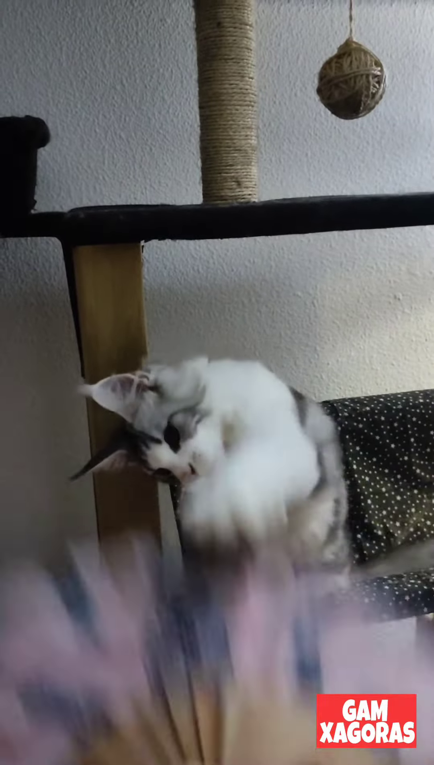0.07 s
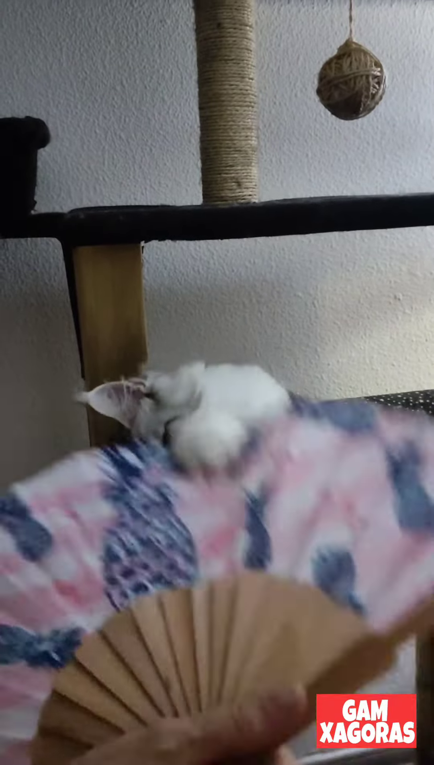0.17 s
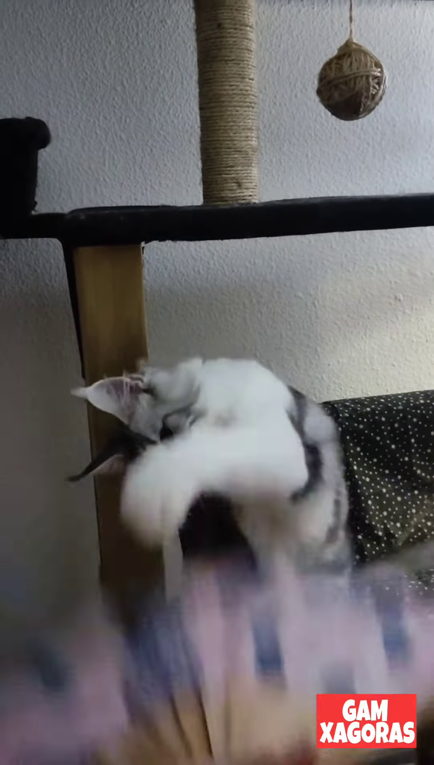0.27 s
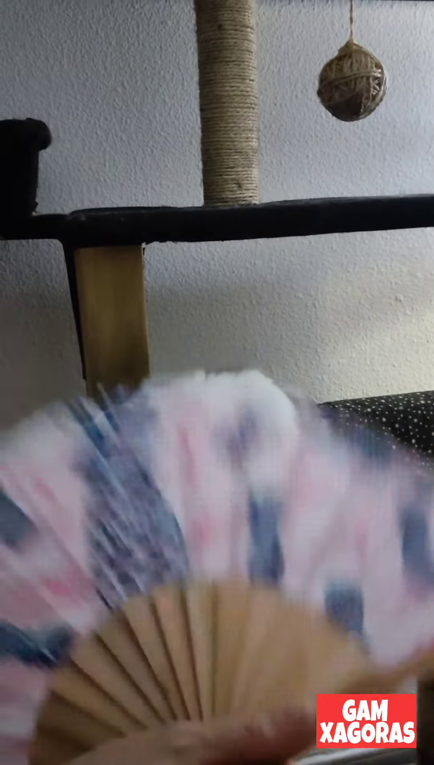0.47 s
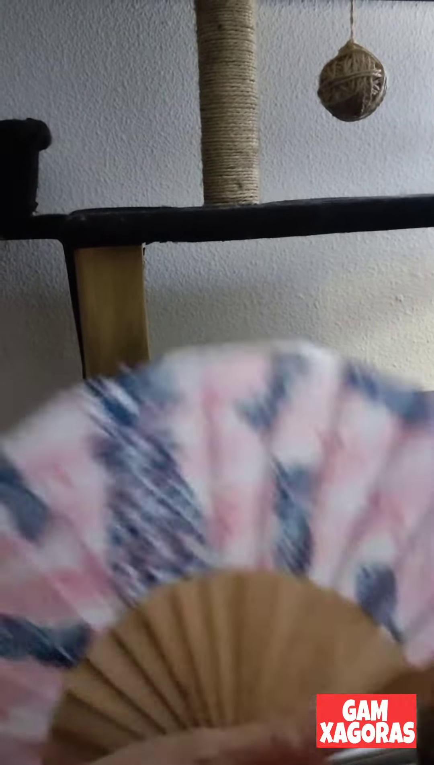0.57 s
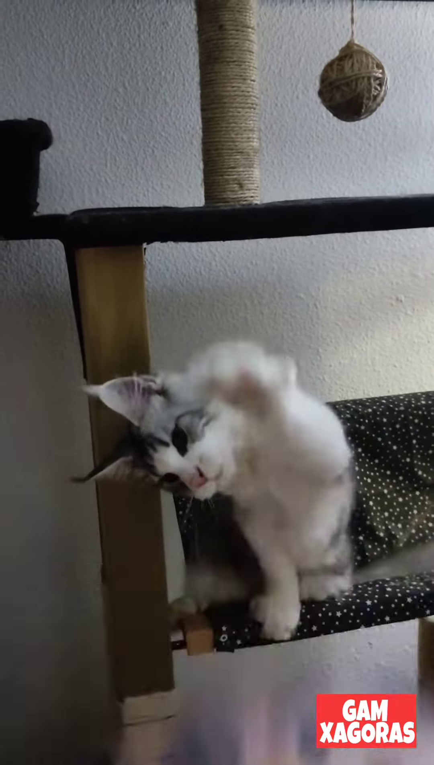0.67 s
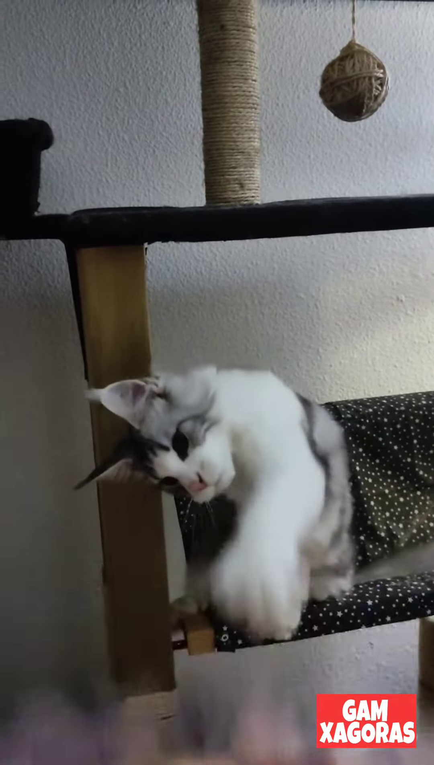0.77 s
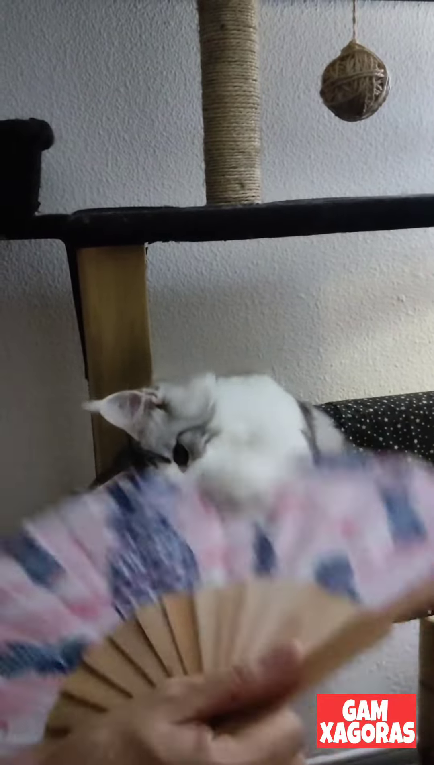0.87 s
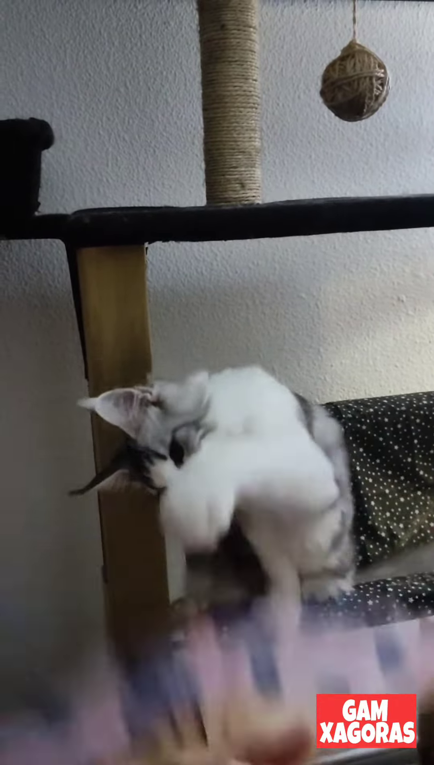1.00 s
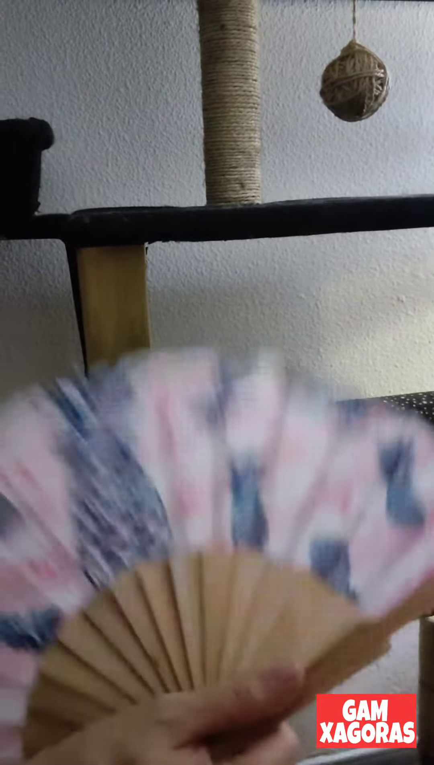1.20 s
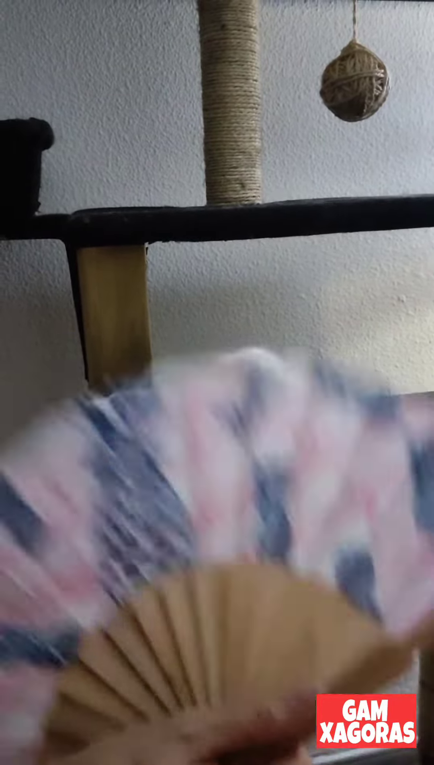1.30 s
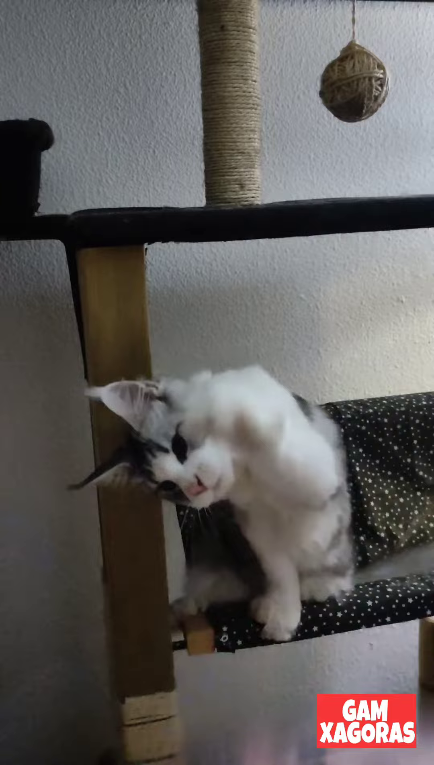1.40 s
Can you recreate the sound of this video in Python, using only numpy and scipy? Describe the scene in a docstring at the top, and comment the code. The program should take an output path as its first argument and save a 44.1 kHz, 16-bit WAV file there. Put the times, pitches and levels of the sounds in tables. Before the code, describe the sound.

Sharp clacks of a cloth and wood hand fan flicked close by, with faint rib rattles between

```python
"""A quiet, small room: a folding hand fan of wood and cloth is flicked close to a phone.
Knocking ribs ring a bank of low wood modes; their edges tick as clicks and crackle through bright resonances.
The cloth rustles as bursts of coloured grains. Decaying noise bands give the room's answer to the fan.
Under it lies a soft floor: steady hiss and a low murmur that swells unevenly."""
import sys
import numpy as np
from scipy import signal
from scipy.fft import rfft, irfft
from scipy.io import wavfile
from scipy.ndimage import uniform_filter1d, map_coordinates

SR = 44100
rng = np.random.default_rng(int(sys.argv[2]) if len(sys.argv) > 2 else 0)


def voltage_ratio(decibels):
    """Convert decibels (scalar or array-like) to amplitude ratios, 20 dB per decade."""
    exponent = np.asarray(decibels, float) / 20
    return 10 ** exponent


def transcribe(signal):
    """Save signal, clipped to [-1, 1], as a 16-bit WAV file at the path in sys.argv[1]."""
    frames = np.atleast_2d(signal).T
    limited = np.clip(frames, -1, 1)
    pcm = np.round(limited * 32767).astype(np.int16)
    wavfile.write(sys.argv[1], SR, pcm)


N = 63945


def read(table, hz):
    """Interpolates a (Hz, value) table over log frequency."""
    table_hz, value = np.array(table, float).T[:2]
    return np.interp(np.log(hz + 1), np.log(table_hz + 1), value)


def colour(x, table, tilt_db_per_octave=0.):
    """Shapes a sound by a spectrum and a tilt around 5 kHz; overall rms 1."""
    hz = np.fft.rfftfreq(x.shape[-1], 1 / SR)
    gain_db = read(table, hz) + tilt_db_per_octave * np.log2(np.maximum(hz, 100) / 5000)
    y = irfft(rfft(x) * voltage_ratio(gain_db), x.shape[-1])
    return y / np.sqrt(np.mean(y ** 2))


def band(x, hz, width_hz):
    """One resonance, gain 1 at the centre."""
    return signal.lfilter(*signal.iirpeak(hz, hz / width_hz, SR), x)


def add(out, x, start_s):
    """Mixes x into out at start_s, cut at the end."""
    i = int(start_s * SR)
    out[..., i:i + x.shape[-1]] += x[..., :N - i]


def pair(likeness, noise):
    """Left and right as sum and difference of two noises, weighted for the given likeness."""
    likeness = np.clip(likeness, 0, 1)
    common = np.sqrt((1 + likeness) / 2) * noise[0]
    opposed = np.sqrt((1 - likeness) / 2) * noise[1]
    return common + opposed * np.array([[1], [-1]])


def pan(left_minus_right_db):
    """Gains of left and right for a level difference."""
    return voltage_ratio(np.array([[left_minus_right_db / 2], [-left_minus_right_db / 2]]))


# Floor spectrum. Each row: frequency in Hz, relative density in dB per Hz.
FLOOR_SPECTRUM = [(18, -61), (30, -1), (86, -9), (118, -7), (420, -8.5), (519, -16.5), (732, -16),
                  (1620, -23), (1940, -26), (13700, -38), (16500, -44)]
# Likeness of left and right in the floor; below 0 plays as 0. Each row: frequency in Hz, likeness (no unit).
FLOOR_LIKENESS = [(60, 0.1), (130, 0.6), (290, 0.6), (640, 0.28), (1410, 0), (3100, 0.08), (6820, 0),
                  (15000, -0.12)]
# Level course of the low murmur. Each row: time in seconds, gain in dB.
MURMUR_LEVEL = [(0, 2.5), (.2, 1), (.45, 0), (.66, -1), (.8, 0), (.93, 4.5), (1.202, 2), (1.45, 2.5)]


def floor():
    """Low murmur of the house that swells unevenly over a steady hiss; both are one shaped noise, split."""
    noise_rms_db, swell_db, swells_per_s, split_hz = -60.5, 4, 26, 1500
    spectra = rfft(rng.standard_normal((2, N)))
    stereo = pair(read(FLOOR_LIKENESS, np.fft.rfftfreq(N, 1 / SR)), spectra)
    noise = colour(irfft(stereo, N), FLOOR_SPECTRUM)
    # random levels, joined by ramps
    hold = int(SR / swells_per_s)
    steps = np.repeat(rng.standard_normal(N // hold + 1), hold)
    swell = uniform_filter1d(steps, hold)[:N]
    murmur = signal.sosfilt(signal.butter(1, split_hz, fs=SR, output="sos"), noise)
    hiss = noise - murmur
    course_db = np.interp(np.arange(N) / SR, *np.array(MURMUR_LEVEL).T)
    return voltage_ratio(noise_rms_db) * (hiss + murmur * voltage_ratio(swell_db * swell + course_db))


# Octave bands of the room. Each row: centre in Hz, gain in dB, t60 in seconds,
# likeness of left and right from 0 to 1.
ROOM_BANDS = [(93.5, -10, .35, 1), (183, -10.5, 0.32, 0.97), (370, -9.5, .4, 0.75), (705, -8, 0.41, 0.16),
              (1500, -6.5, 0.45, 0), (2980, -5.5, 0.42, 0), (5720, -6.5, 0.39, 0.02), (10960, -6, 0.32, 0)]


def echoes():
    """Octave bands of noise that build up quickly and die each at its own rate."""
    build_s, length_s = .006, .6
    t, tail = np.arange(int(length_s * SR)) / SR, 0
    for hz, gain_db, t60_s, likeness in ROOM_BANDS:
        edges_hz = [hz / np.sqrt(2), hz * np.sqrt(2)]
        octave = signal.butter(2, edges_hz, "band", fs=SR, output="sos")
        shape = (1 - np.exp(-t / build_s)) * 1000 ** (-t / t60_s)
        noise = signal.sosfilt(octave, rng.standard_normal((2, len(t))))
        tail = tail + voltage_ratio(gain_db) * pair(likeness, noise) * shape / np.sqrt(np.sum(shape ** 2))
    return tail


# Places of the moving hand, each exciting other echoes. Each row: start in seconds, echo gain in dB.
HAND_PLACES = [(0, -1), (.55, 1), (.92, 0.5), (1.24, -0.5)]


def room(fan):
    """Convolves what sounds at each place of the hand with that place's own echoes."""
    out = np.zeros((2, N))
    ends_s = [start_s for start_s, _ in HAND_PLACES[1:]] + [N / SR]
    for (start_s, gain_db), end_s in zip(HAND_PLACES, ends_s):
        source = fan[:, int(start_s * SR):int(end_s * SR)].mean(axis=0)
        answer = signal.fftconvolve(source[None], echoes(), axes=1)
        add(out, voltage_ratio(gain_db) * answer, start_s)
    return out


# Moves of the cloth leaf. Each row: start in seconds, level in dB, rise time constant in ms,
# decay time constant in ms, tilt in dB per octave.
RUSTLE_EVENTS = [(0.116, -55.5, 0.88, 16.6, 1), (0.2089, -28.5, 2.6, 20.1, 1.5), (0.864, -55, 2.2, 22, 0),
                 (.948, -34.5, 3.6, 31, 2), (1.276, -47.5, 3.7, 54, 1), (1.318, -48, 2.6, 9.4, 3.5),
                 (1.423, -56, 1.5, 11, -1)]
# Cloth spectrum before the tilt. Each row: frequency in Hz, relative density in dB per Hz.
CLOTH_SPECTRUM = [(350, -3), (600, 1.5), (2470, -10), (2800, -10), (8620, -14.5), (14900, -31.5),
                  (16000, -47)]


def cloth():
    """Dense uneven grains, coloured as cloth, that swell and die with each move of the leaf."""
    grains_per_s, grain_spread_db = 3500, 1.5
    out, t = np.zeros((2, N)), np.arange(SR // 3) / SR
    for start_s, level_db, rise_ms, decay_ms, tilt in RUSTLE_EVENTS:
        chance, sign, size = rng.random((3, 2, len(t)))
        grain_db = -grain_spread_db * np.log(size + 1e-9)
        grains = (chance < grains_per_s / SR) * np.sign(sign - .5) * voltage_ratio(grain_db)
        shape = (1 - np.exp(-1000 * t / rise_ms)) * np.exp(-1000 * t / decay_ms)
        rustle = colour(pair(0.13, grains), CLOTH_SPECTRUM, tilt)
        add(out, voltage_ratio(level_db) * shape * rustle, start_s)
    return out


# Rib edges ticking. Each row: start in seconds, peak before panning in dB, decay time constant of the
# crackle in ms, tilt in dB per octave, left minus right in dB.
TICK_EVENTS = [(.118, -61, 1.1, -2, -4), (0.2084, -15, 0.94, -7.5, 2), (0.21, -18.5, 0.63, 1, 7.5),
               (0.2144, -13.5, 1.36, 3, 7), (.213, -25.5, 0.79, -13, 2), (0.218, -27, 2.1, 9, -12),
               (.229, -43, 1.1, 2, 9), (.7027, -52, 2., -10.5, -7), (.7413, -51, 1, -15, 0),
               (.784, -55.5, 1.5, -7, -5), (0.868, -57, 1., 3, 7), (.877, -55, 0.79, -3, -12),
               (.9479, -22, .8, 3, -1), (.9499, -11, .6, 3, 1), (0.954, -39, 0.25, 4, 0),
               (0.9607, -21, 0.66, 12, -7), (0.9616, -24, 0.75, -5.5, 14.5), (0.97, -25.5, 1.8, -4.5, 8.5),
               (1.2775, -25, 0.78, 8, 6.5), (1.286, -38, 0.36, 7, 14), (1.3156, -39, 1.3, 0, 17),
               (1.4225, -47, 1.2, -11, -1)]
# Short rings of the rib edges. Each row: centre in Hz, width in Hz, relative gain before the tilt in dB.
EDGE_RINGS = [(1500, 1400, -9.5), (3240, 1380, -1.5), (4850, 2950, -2), (6360, 980, -1.5), (8610, 1520, -1),
              (13100, 5600, -8), (14350, 1350, -6)]


def ticks():
    """A click and a brief crackle, partly alike left and right, ring the rib edges."""
    click_level = 2.4
    out, t = np.zeros((2, N)), np.arange(SR // 50) / SR
    noises = rng.standard_normal((len(TICK_EVENTS), 2, len(t)))
    for (start_s, peak_db, decay_ms, tilt, pan_db), noise in zip(TICK_EVENTS, noises):
        burst = (pair(0.61, noise) + click_level * (t == 0)) * np.exp(-1000 * t / decay_ms)
        ring = 0
        for k, (hz, width_hz, gain_db) in enumerate(EDGE_RINGS):
            gain = (-1) ** k * voltage_ratio(gain_db + tilt * np.log2(hz / 5000))
            ring = ring + gain * band(burst, hz, width_hz)
        add(out, voltage_ratio(peak_db) * pan(pan_db) * ring / abs(ring).max(), start_s)
    return out


# Ribs knocking together. Each row: start in seconds, peak in dB, contact time in ms,
# favoured region in octaves above the lowest mode, its spread in octaves.
KNOCK_EVENTS = [(.033, -61, .8, -2, 0.55), (0.04, -48.5, 0.58, 2.4, 0.48), (.199, -23.5, 10, 7.5, .8),
                (0.2082, -24, .6, 1, 0.88), (0.2092, -21.5, 1.1, 0.8, 0.67),
                (.2118, -13.5, 0.48, 2.25, 0.27), (0.2146, -21, 0.24, 2.5, 0.87),
                (0.291, -33.5, 0.5, 2.44, 0.25), (0.343, -55, 0.58, 2.8, 0.28),
                (0.369, -41.5, 1.24, 3.9, 0.37), (0.391, -43, 0.57, 2.7, 0.88), (.497, -59, 0.81, -3, .5),
                (0.579, -50, 2.3, 3.5, 0.6), (0.686, -39.5, 0.3, 2.05, 0.48),
                (0.703, -38.5, 0.12, 2.53, 0.77), (0.74, -39.5, 0.096, 2.5, 0.59),
                (0.783, -54, 0.19, 3, 0.52), (0.868, -45.5, 0.7, 2.5, 0.23), (.9462, -29, .5, 2.6, .35),
                (.9522, -26.5, 0.69, 2.5, 0.37), (.9545, -32, 0.54, 1.5, .4), (.9615, -29, 1.8, .75, .25),
                (0.989, -38, 0.69, 2.2, .25), (1.088, -46.5, 1.83, 3, 0.53), (1.19, -53.5, .2, 20, 1.1),
                (1.270, -42, 2.6, 0, 0.77), (1.2743, -45, 0.21, 5, 0.4), (1.278, -35.5, 0.3, 1.85, 1),
                (1.3163, -37, 0.9, 3.17, 0.65), (1.325, -47, 1.9, 1.04, 0.75),
                (1.367, -44, 0.24, 2.5, 0.59), (1.424, -43.5, 0.68, 3, 0.88), (1.431, -42, 0.23, 2.5, 0.4)]
# Modes of wooden ribs and handle, before scatter. Each row: frequency in Hz, relative level in dB,
# t60 in seconds.
WOOD_MODES = [(116.8, -5.5, 0.1), (157, -14.5, 0.19), (207, -4, 0.104), (272.4, -19, 0.3),
              (345, -5.5, 0.11), (385.4, -2, 0.095), (429.8, 1, 0.034), (520, -14.5, 0.054),
              (579, -2.5, 0.014), (741, -10, 0.019), (878, -6.5, 0.015), (1037, -10, 0.046),
              (1204, -7, 0.019), (1457, -3.5, 0.024), (1673, -8.5, 0.072), (2140, -8, .025),
              (2860, -10, .02), (3400, -33, 0.012)]


def knocks():
    """A short smooth push rings the wood, most in its favoured region; neighbouring modes swing opposite."""
    elsewhere_db, level_scatter_db, pitch_scatter = -22, 1.5, 0.013
    out, t = np.zeros(N), np.arange(SR // 4) / SR
    hz, mode_db, t60_s = np.array(WOOD_MODES, float).T[:, :, None]
    swing = (-1.) ** np.arange(len(WOOD_MODES))[:, None]
    octave = np.log2(hz / hz[0])
    scatter = rng.standard_normal((len(KNOCK_EVENTS), len(WOOD_MODES), 2))
    for (start_s, peak_db, contact_ms, region, spread), r in zip(KNOCK_EVENTS, scatter):
        # far modes still ring at elsewhere_db
        favour = voltage_ratio(-6 * ((octave - region) / spread) ** 2) + voltage_ratio(elsewhere_db)
        gain = swing * favour * voltage_ratio(mode_db + level_scatter_db * r[:, :1])
        mode_hz = hz * (1 + pitch_scatter * r[:, 1:])
        modes = gain * np.sin(2 * np.pi * mode_hz * t) * 1000 ** (-t / t60_s)
        push = np.hanning(int(contact_ms * SR / 1000) + 3)
        ring = np.convolve(modes.sum(axis=0), push)
        add(out, voltage_ratio(peak_db) * ring / abs(ring).max(), start_s)
    return out


def scene():
    """The fan close by, its echo, the floor; the left port hears the direct fan a little late."""
    left_lag_ms = 0.074
    fan = knocks() + ticks() + cloth()
    late = map_coordinates(fan[0], [np.arange(N) - left_lag_ms * SR / 1000], mode="nearest")
    return floor() + room(fan) + np.array([late, fan[1]])


def roll_off(x):
    """The treble ends steeply here."""
    return signal.sosfilt(signal.butter(12, 16650, fs=SR, output="sos"), x)


# Colour difference of the two ports. Each row: frequency in Hz, left minus right in dB.
PORT_DIFFERENCE = [(60, 3.5), (110, 0.5), (200, 1.5), (380, -1.5), (700, 1.0), (1290, 0), (2380, -1.5),
                   (4400, 1.0), (8120, 2.5), (15000, -8.5)]


def record(dry):
    """The phone's two ports differ a little in colour; it drops the deepest bass and the very top."""
    low_hz, top_hz = 75, 15700
    side_db = read(PORT_DIFFERENCE, np.fft.rfftfreq(N, 1 / SR)) / 2
    ports = irfft(rfft(dry) * voltage_ratio(np.array([side_db, -side_db])), N)
    no_bass = signal.sosfilt(signal.butter(5, low_hz, "high", fs=SR, output="sos"), ports)
    mix = signal.sosfilt(signal.cheby1(8, .5, top_hz, fs=SR, output="sos"), no_bass)
    return roll_off(mix)


dry = scene()
out = record(dry)
transcribe(out)
```